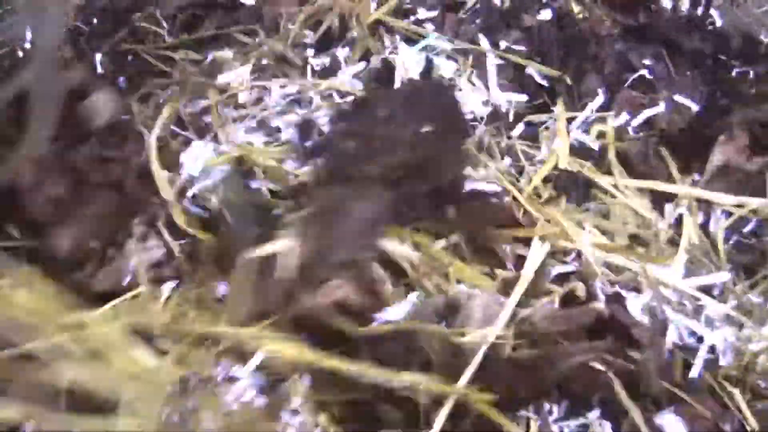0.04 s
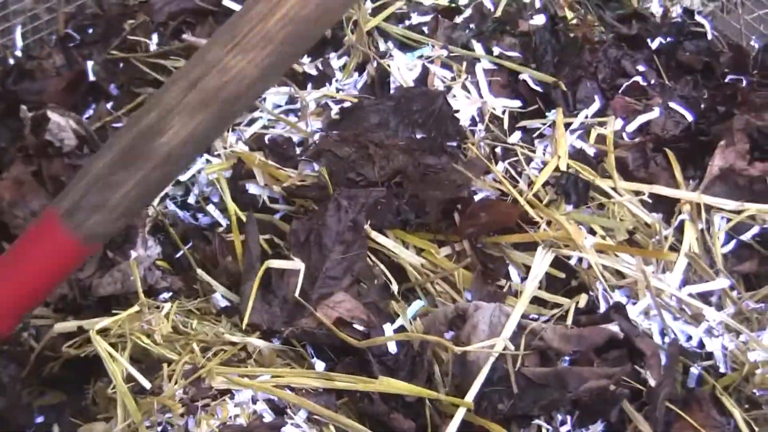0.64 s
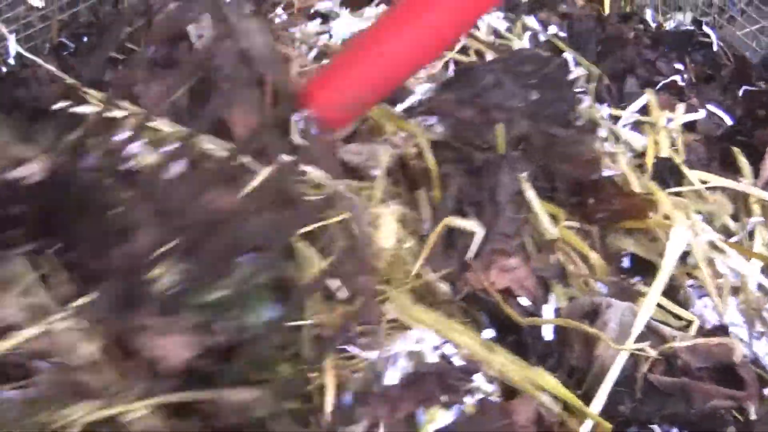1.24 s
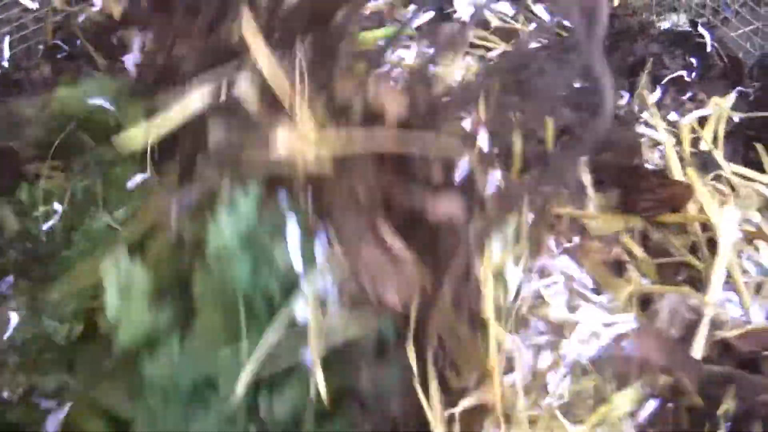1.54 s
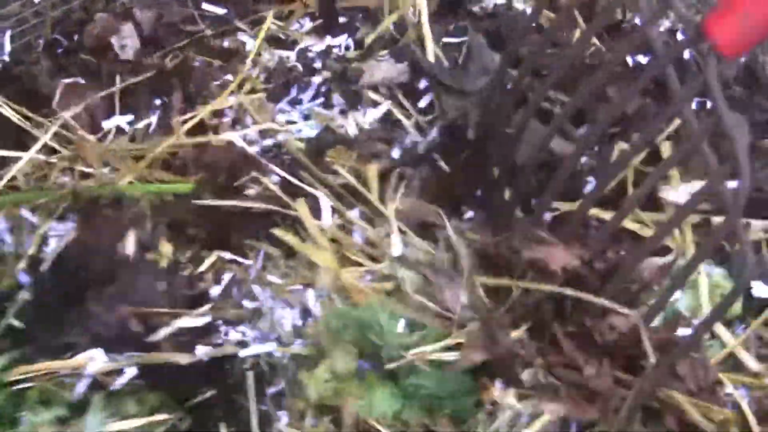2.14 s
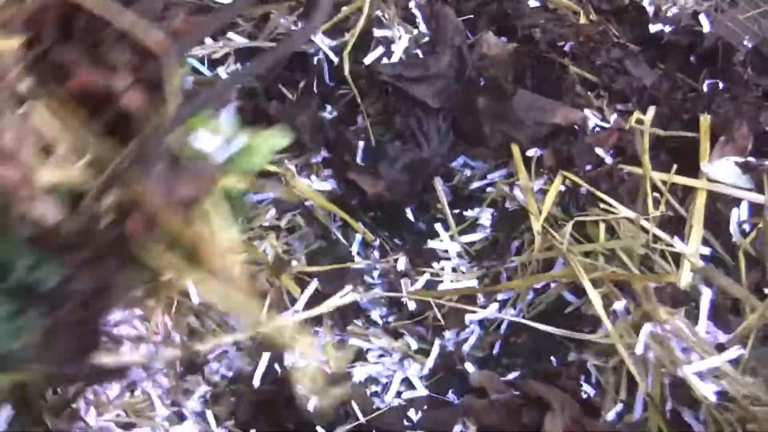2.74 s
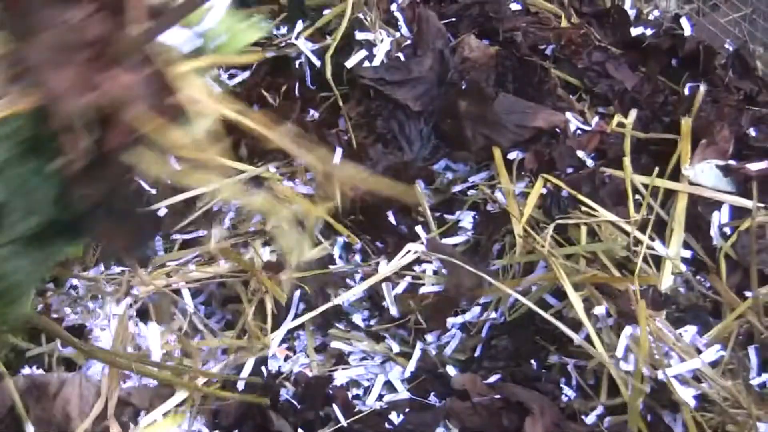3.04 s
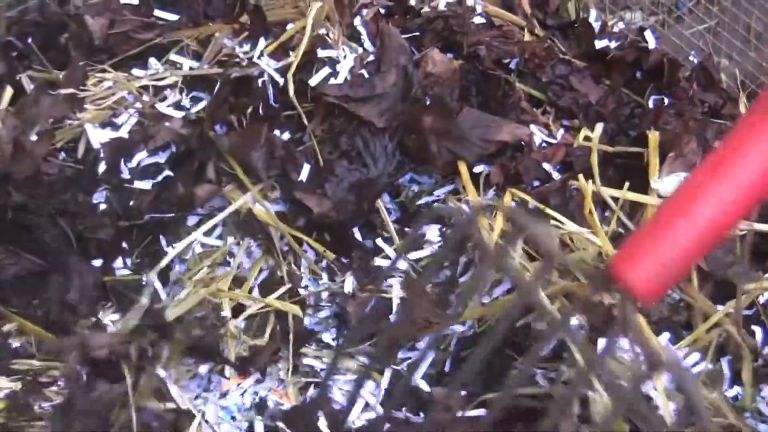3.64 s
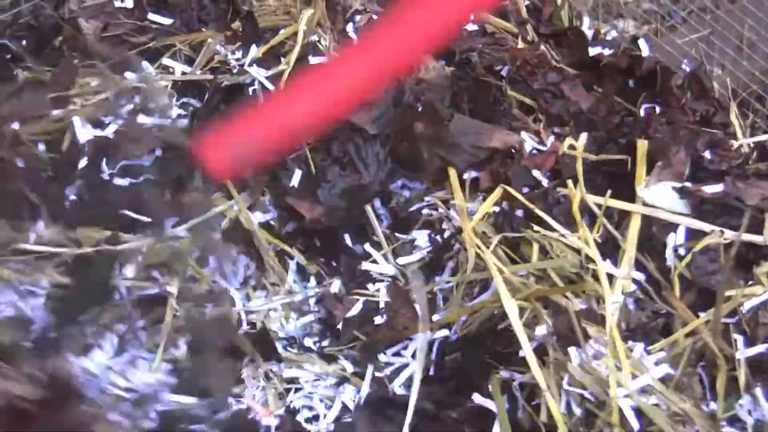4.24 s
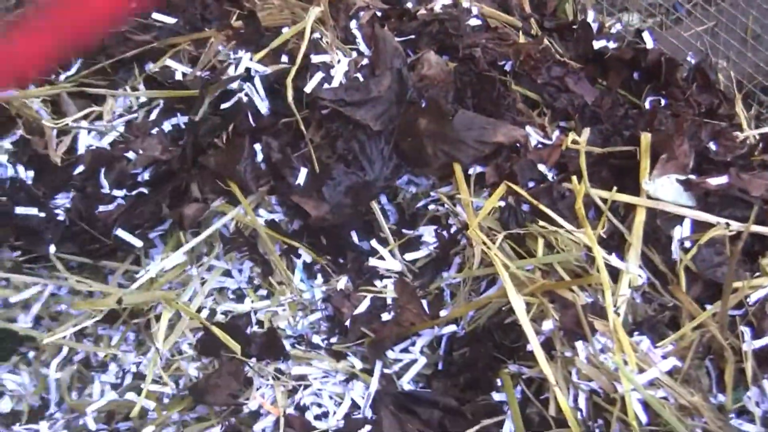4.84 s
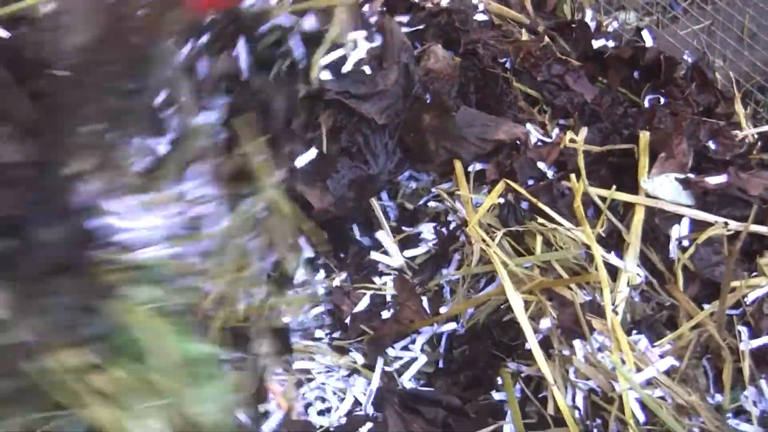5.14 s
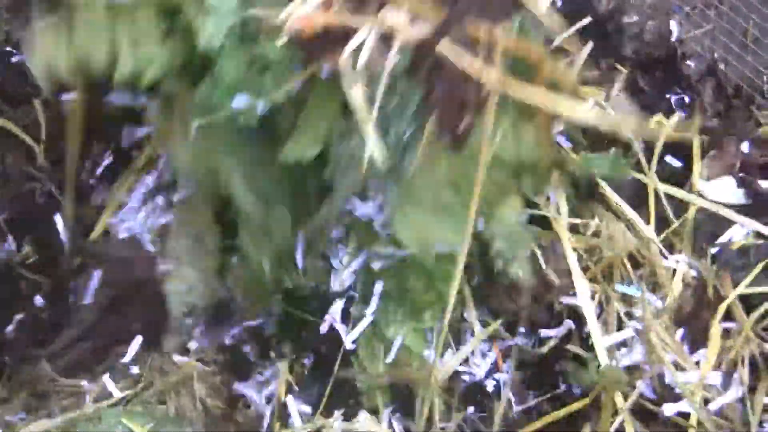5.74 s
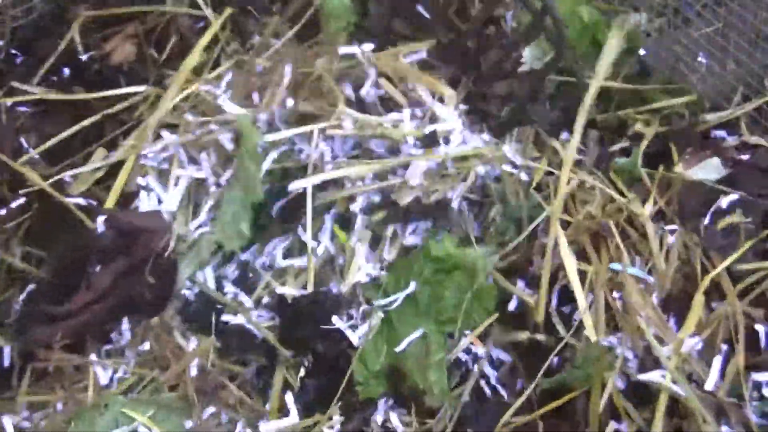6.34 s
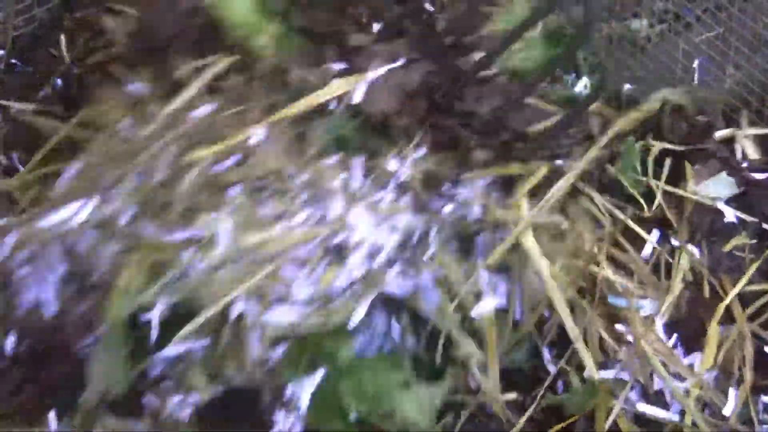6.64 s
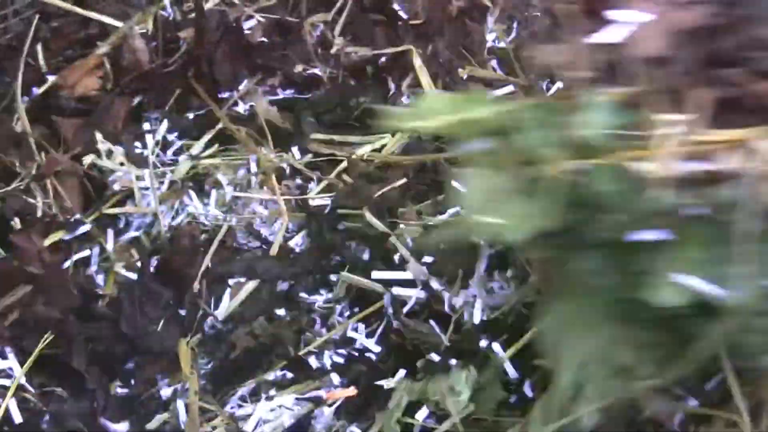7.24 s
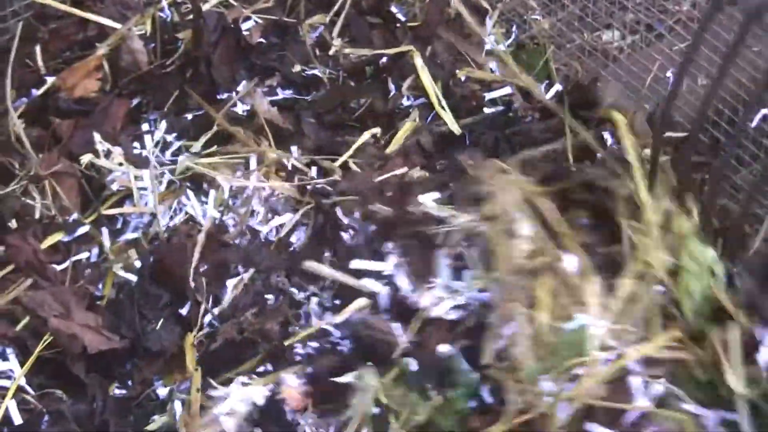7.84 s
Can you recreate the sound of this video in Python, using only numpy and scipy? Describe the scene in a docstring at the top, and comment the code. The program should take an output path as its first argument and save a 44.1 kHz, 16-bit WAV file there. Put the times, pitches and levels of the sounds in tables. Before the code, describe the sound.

A garden fork turns dry leaves, straw and shredded paper in a compost bin, heard close up over a low wash of outdoor air. For about eight seconds, uneven strokes swell and fade as a dense hiss with a crunch underneath, dotted with bright stalk snaps and tine ticks. Around 0.5 seconds the fork knocks and scrapes on the hollow, booming wall, with lighter knocks near 1.5. A deeper knock comes at 2.7, then sharp clacks and a short scrape just after 3, and another knock at 3.6. At about 4.6 the hardest blow briefly overloads the microphone, followed by more clacks and a scrape around 5. Tipped clumps land with soft thuds near 5.5 seconds, a light scrape follows at 6.2, and fainter thuds come at 7. One last knock falls near 7.8 among the closing rustling strokes.

```python
"""Outdoors, microphone close to a compost bin: a garden fork turns dry leaves, straw and shredded paper.
From the start, over a low wash of open air, each stroke swells and fades as a dense hiss. Soon the fork
knocks on the bin, stalks snap and the tines tick and scrape on the booming wall. Some four and a half
seconds in, the hardest blow overloads the microphone. Tipped clumps then land with soft thuds, near five
and a half seconds and again at seven, and one last knock falls among the closing strokes."""
import sys
import numpy as np
from scipy import signal
from scipy.fft import rfft, irfft, next_fast_len
from scipy.io import wavfile
from scipy.ndimage import uniform_filter1d, map_coordinates

SR = 44100
rng = np.random.default_rng(int(sys.argv[2]) if len(sys.argv) > 2 else 0)


def digitize_waveform(pressure):
    """Quantize a signal to 16-bit integers and store it at the path in sys.argv[1].

    Rows of a 2-D input are taken as channels; values are limited to [-1, 1].
    """
    field = np.atleast_2d(pressure).T
    bounded = np.clip(field, -1, 1)
    quanta = np.round(bounded * 32767).astype(np.int16)
    wavfile.write(sys.argv[1], SR, quanta)


N = 356769

# Distant air; leaves hissing close by; the packed bulk crunching under them.
# Each row: frequency in Hz, relative level per Hz in dB.
AIR_SPECTRUM = [(20, 1), (35, -5), (60, 2.5), (85, 3.5), (150, -1), (330, -2), (550, -10), (800, -9),
                (1500, -15), (4000, -29), (16000, -48)]
HISS_SPECTRUM = [(300, -10.5), (1000, -4.5), (2200, -2.5), (3100, 0.5), (4200, -2.5), (5200, -0.5),
                 (6200, -2), (7800, 1), (10000, -1), (13000, -2.5), (16000, -5)]
CRUNCH_SPECTRUM = [(100, -10.5), (300, 3), (550, 2.5), (800, 3.5), (1150, 3.5), (1600, 1.5), (2150, -7.5),
                   (3000, -5.5), (4500, -11.5), (9000, -23)]
# Stereo image of heap and bin at the microphone. Each row: frequency in Hz, left-right likeness, 0 to 1.
HEAP_LIKENESS = [(60, 0.74), (300, 0.23), (700, 0.52), (1300, 0.84), (2400, 0.73), (4400, 0.54),
                 (8000, 0.37), (15000, 0.091)]
BIN_LIKENESS = [(100, 0.99), (500, 0.9), (1200, 0.77), (2400, 0.47), (4500, 0.62), (12000, 0.86)]
# The fork going through the heap. Each row: crest, rise and fall in seconds, relative hiss level in dB,
# crunch offset from that level in dB.
FORK_STROKES = [(0.0, .1, 0.45, -47, -11), (0.337, 0.064, 0.063, -32, 4), (.68, 0.19, 0.78, -49.5, 8.5),
                (1.25, 0.48, 0.66, -43, -1), (1.92, 0.24, 0.21, -44.5, -1), (2.07, 0.14, 0.084, -40, 3),
                (2.5, 0.46, 0.73, -44.5, -3), (3.22, 0.12, 0.16, -39.5, 10), (3.54, 0.2, 0.2, -38, -1),
                (4.07, 0.081, 0.13, -38, -1.5), (4.3, 0.32, 0.42, -44, 0), (4.89, .08, 0.13, -42.5, 4.5),
                (5.17, 0.28, 0.29, -40.5, 4), (5.35, 0.3, 0.34, -42.5, -20), (6.19, 0.24, 0.1, -41.5, 0.5),
                (6.78, 0.41, .28, -42.5, -6.5), (7.17, 0.34, 0.32, -50, -15), (7.61, .19, 0.1, -40.5, 2),
                (8.09, 0.34, .2, -41.5, -4.5)]
# The fork hitting the bin. Each row: start in seconds, relative level in dB, boom and tine clank offsets
# from that level in dB, boom and clack centres in Hz.
FORK_KNOCKS = [(.164, -31, -29, -15, 352, 1230), (0.385, -25, -13, -13, 100, 1290),
               (.417, -26, -4, -27, 330, 675), (.457, -15.5, -10.5, -22, 375, 670),
               (.512, -23.5, -9, -21, 344, 676), (.533, -28.5, -4.5, -29, 377, 670),
               (1.105, -40.5, -3.5, -19, 290, 900), (1.508, -28, -6.5, -14.5, 334, 970),
               (1.602, -29.5, -9, -20, 288, 1100), (1.629, -29.5, -9.5, -12.5, 246, 1070),
               (2.605, -32.5, -10, -23, 330, 1400), (2.673, -15, 5, -19, 287, 1360),
               (3.047, -25.5, -32, -14, 137, 1050), (3.101, -6.5, -37, -10.5, 477, 1310),
               (3.108, -5.5, -21.5, -14.5, 480, 1330), (3.228, -19.5, -21, -8, 136, 1100),
               (3.602, -20, -15.5, -13, 292, 1170), (3.811, -26.5, -19, -13.5, 151, 980),
               (4.441, -29, -14, -24, 403, 775), (4.578, 0.5, -8, -23, 210, 910),
               (4.636, -21, -1, -20, 216, 780), (4.704, -23, -7, -9, 266, 920),
               (4.8, -32, -4.5, -11, 260, 1000), (4.968, -27.5, 6.5, -7.5, 194, 940),
               (5.001, -9.5, -31, -12, 150, 1020), (5.008, -12, -26, -8, 150, 1300),
               (5.138, -19.5, -22, -10.5, 150, 980), (5.204, -26, 2.5, -9, 237, 900),
               (5.344, -37, 1.5, 0, 218, 1250), (5.852, -48.5, 6.5, -9, 223, 800),
               (6.155, -29.5, -20, -19, 330, 1000), (6.26, -38.5, -3.5, -11, 280, 1100),
               (7.776, -31.5, -4, -11.5, 356, 730)]
# Main modes of wall and fork. Each row: frequency in Hz, relative level in dB, base t60 in seconds.
WALL_MODES = [(83, -8, 0.5), (146.6, -1, 0.31), (213.6, -3.5, 0.31), (267.7, 2.5, 0.062),
              (354.7, 2.5, 0.098), (396, -5.5, 0.22), (483, -4, 0.25), (518, -6, 0.084), (646, -9.5, 0.1),
              (776, -4.5, 0.16), (965.5, -6.5, 0.13), (1217, -18, 0.16), (1296, -4, 0.082),
              (1385, -12, 0.2), (1580, -32, 0.1), (1774, -14.5, 0.1), (1812, -12, 0.14),
              (1937, -15.5, 0.08), (1992, -9, 0.14), (2260, -22, 0.37), (2775, -16.5, .13),
              (3000, -14, 0.087), (3710, -18, 0.1)]
# The wall's crowded, short modes. Each row: frequency in Hz, relative level per Hz in dB.
CLATTER_SPECTRUM = [(50, -15), (130, -4), (280, -0.5), (450, -3), (620, -10.5), (900, -5), (1400, -12.5),
                    (2250, -8.5), (2650, -20), (3600, -26), (5000, -25.5), (9000, -32), (16000, -60)]
# How those modes die away. Each row: frequency in Hz, base t60 in seconds.
CLATTER_DECAY = [(100, 0.51), (500, 0.31), (2000, 0.32), (4000, 0.33), (10000, 0.069)]
# Snaps of dry stalks and ticks of the tines. Each row: start in seconds, relative level in dB, pitch in Hz.
SNAPS_AND_TICKS = [(.166, -23.5, 7800), (.281, -21, 6950), (2.075, -22, 3000), (2.718, -29, 4100),
                   (3.1, -15.5, 6530), (3.938, -24.5, 2810), (4.664, -19.5, 3460), (5.003, -19, 3400),
                   (5.007, -15.5, 6550), (5.702, -29, 9900), (5.84, -29.5, 5600), (6.241, -24, 10400),
                   (7.062, -24.5, 3250), (7.122, -31, 12500), (7.289, -26, 4300)]
# Tines dragged along the wall. Each row: start and end in seconds, boom, clack and clank levels in dB,
# boom and clack centres in Hz.
TINE_SCRAPES = [(0.431, 0.572, -39.5, -47.5, -72, 326, 650), (2.811, 2.85, -38, -51, -45.5, 136, 900),
                (2.94, 2.986, -44, -53.5, -56, 144.3, 900), (3.054, 3.117, -30.5, -37, -43, 134, 1000),
                (3.116, 3.268, -35.5, -30.5, -34.5, 132.6, 1280), (3.726, 3.8, -46, -53, -56, 131, 910),
                (5.004, 5.082, -42, -34, -35, 151, 1000), (6.173, 6.265, -47.5, -47.5, -49, 318, 985)]
# Forkfuls tipped into the bin. Each row: start and end in seconds, thud level in dB, boom centre in Hz.
TIPPED_FORKFULS = [(5.376, 5.53, -36.5, 207), (7.039, 7.32, -49, 310)]


def amp(db):
    """Decibels to gain."""
    return 10 ** (np.asarray(db) / 20)


def unit(x):
    """Scale to rms 1."""
    return x / np.sqrt(np.mean(x ** 2) + 1e-20)


def along(points, hz):
    """Read (Hz, value) points on a log axis."""
    knots_hz, values = np.transpose(points)
    return np.interp(np.log(hz + 1), np.log(knots_hz), values)


def wobble(rate):
    """A smooth random curve, rate knots a second."""
    knots = rng.standard_normal(int(N * rate / SR) + 4)
    return map_coordinates(knots, [np.arange(N) * rate / SR])


def filtered(x, response):
    """Pass x through a response given as a function of Hz."""
    n = x.shape[-1]
    padded = next_fast_len(n + 4096)
    return irfft(rfft(x, padded) * response(np.fft.rfftfreq(padded, 1 / SR)), padded)[..., :n]


def spread(pair, spectrum, likeness):
    """Colour two unrelated signals as mid and side, then decode to left and right, rms 1."""
    def response(hz):
        width = np.arccos(np.clip(along(likeness, hz), -1, 1)) / 2
        return amp(along(spectrum, hz)) * [np.cos(width), np.sin(width)]
    mid, side = filtered(pair, response)
    return unit(np.array([mid + side, mid - side]))


def noise(samples, spectrum, likeness):
    """Coloured stereo noise, rms 1."""
    return spread(rng.standard_normal((2, samples)), spectrum, likeness)


def add(track, start, sound):
    """Mix a sound into a track at start seconds."""
    part = track[:, max(round(start * SR), 0):][:, :sound.shape[-1]]
    part += sound[:, :part.shape[-1]]


def ticks(rate, scatter_db):
    """Two streams of tiny random contacts, rate a second, of uneven size."""
    struck = rng.random((2, N)) < rate / SR
    size = rng.standard_normal((2, N)) * amp(scatter_db * rng.standard_normal((2, N)))
    return unit(struck * size / np.sqrt(rate))


def open_air():
    """A low wash of air from far beyond the bin, wavering slightly."""
    return amp(-49.5 + 1.3 * wobble(5.2)) * noise(N, AIR_SPECTRUM, HEAP_LIKENESS)


def stroke_levels(drop_db=11.5, roundness=1.56):
    """Each stroke swells to its fastest moment and dies away. Gives hiss and crunch in dB."""
    t = np.arange(N) / SR
    hiss, crunch = amp(-55.5) ** 2, amp(-51.5) ** 2  # the heap keeps settling between strokes
    for crest, rise, fall, db, crunch_db in FORK_STROKES:
        away = np.abs(t - crest) / np.where(t < crest, rise, fall)
        power = amp(db - drop_db * away ** roundness) ** 2
        hiss += power
        crunch += power * amp(crunch_db) ** 2
    return 10 * np.log10(hiss), 10 * np.log10(crunch)


def shimmer(pair, depth_db=1.5):
    """Random, shifting patches of the spectrum swell and fade, giving the rustle a faint shimmer."""
    frames = signal.stft(pair, nperseg=1024)[2]
    patches = uniform_filter1d(rng.standard_normal(frames.shape[1:]), size=5, axis=0)
    patches = uniform_filter1d(patches, size=7, axis=1)
    return signal.istft(frames * amp(depth_db * unit(patches)), nperseg=1024)[1][:, :N]


def heap_rustle():
    """Close up, leaf edges rub into a hiss and the bulk crunches; faster sliding brings more flicks."""
    hiss_db, crunch_db = stroke_levels()
    flow = amp(hiss_db - hiss_db.max())
    flutter_db = wobble(45)
    flicks = ticks(900 + 5000 * flow, scatter_db=1.5)
    edges = shimmer(rng.standard_normal((2, N)) + .33 * flicks)
    hiss_gain = amp(hiss_db + 3 + .5 * flutter_db + .66 * wobble(170))
    hiss = hiss_gain * spread(edges, HISS_SPECTRUM, HEAP_LIKENESS)
    folds = shimmer(ticks(4000 + 9000 * flow, scatter_db=2))
    crunch = amp(crunch_db - 4 + flutter_db) * spread(folds, CRUNCH_SPECTRUM, HEAP_LIKENESS)
    return hiss + crunch


def wall_ring(decay_scale, clatter_db=-6, slap_db=6, slap_t60=.045):
    """One blow on the wall: main modes at random strengths, a clatter of crowded modes, the first slap."""
    t = np.arange(SR // 2) / SR
    hz, db, t60 = np.transpose(WALL_MODES)[:, :, None]
    scatter_db, phase = rng.standard_normal((2, len(WALL_MODES), 1))
    loaded_hz = hz * (1 + .0045 * rng.standard_normal(hz.shape))  # leaning compost shifts each mode
    envelopes = amp(db + scatter_db - 60 * t / (t60 * decay_scale))
    modes = envelopes * np.sin(2 * np.pi * (loaded_hz * t + phase))
    crowd = noise(len(t), CLATTER_SPECTRUM, BIN_LIKENESS)
    band_hz, frame_s, frames = signal.stft(crowd, SR, nperseg=256)
    band_t60 = decay_scale * along(CLATTER_DECAY, band_hz)[:, None]
    clatter = signal.istft(frames * amp(-60 * frame_s / band_t60), SR, nperseg=256)[1][:, :len(t)]
    slap = noise(len(t), CLATTER_SPECTRUM, BIN_LIKENESS) * amp(-60 * t / slap_t60)
    return modes.sum(0) + amp(clatter_db) * clatter + amp(slap_db) * slap


def contact(ring, boom_db, clack_db, clank_db, boom_hz, clack_hz, boom_q, span_s):
    """The point of contact favours a boom and a clack pitch. Levels are rms over the first span_s."""
    def band(edges_hz, kind):
        return signal.sosfilt(signal.butter(3, edges_hz, kind, fs=SR, output="sos"), ring)
    boom = signal.lfilter(*signal.iirpeak(boom_hz, Q=boom_q, fs=SR), band(600, "lowpass"))
    clack = signal.lfilter(*signal.iirpeak(clack_hz, Q=2.3, fs=SR), band([580, 1600], "bandpass"))
    clank = band(1600, "highpass")
    parts = [(boom_db, boom), (clack_db, clack), (clank_db, clank)]
    return sum(amp(db) * part / np.std(part[:, :int(span_s * SR)]) for db, part in parts)


def fork_knocks():
    """Blows cushioned by compost boom, bare tines clank; the harder the blow, the longer the ring."""
    track = np.zeros((2, N))
    for start, db, boom_db, clank_db, boom_hz, clack_hz in FORK_KNOCKS:
        force_db = db + max(boom_db, 0)
        ring = wall_ring(decay_scale=np.clip(1.4 + .013 * force_db, .6, 1.1))
        levels_db = db + boom_db + .46, db - 9, db + clank_db + .5
        add(track, start, contact(ring, *levels_db, boom_hz, clack_hz, boom_q=1.29, span_s=.0099))
    return track


def snaps_and_ticks(t60=.051, trim_db=-11, ping_db=-8):
    """Short, bright snaps of dry stalks and ticks of the tines, each with a brief ping."""
    track = np.zeros((2, N))
    t = np.arange(SR // 16) / SR
    for start, db, hz in SNAPS_AND_TICKS:
        spectrum = [(hz / 8, -20), (hz / 2, -13), (hz, 0), (hz * 2, -13)]
        burst = noise(len(t), spectrum, HEAP_LIKENESS)
        ping = amp(ping_db) * np.sin(2 * np.pi * hz * t)
        add(track, start, amp(db + trim_db - 60 * t / t60) * (burst + ping))
    return track


def tine_scrapes():
    """The tines stick and slip; every slip rings the wall, which groans on a low mode."""
    track = np.zeros((2, N))
    slips = ticks(700, scatter_db=1)[0]
    for start, end, *voice in TINE_SCRAPES:
        drag = slips[int(start * SR):int(end * SR)]
        ring = wall_ring(decay_scale=.48, clatter_db=0, slap_db=16, slap_t60=.01)
        groan = signal.fftconvolve(drag[None], ring, axes=1)
        add(track, start, contact(groan, *voice, boom_q=11, span_s=len(drag) / SR))
    return track


def falling_clumps(gap_s=.065, jitter_s=.0054, scatter_db=.5):
    """Clumps drop off the fork at uneven intervals and thud softly against the wall."""
    track = np.zeros((2, N))
    for start, end, thud_db, boom_hz in TIPPED_FORKFULS:
        for due in np.arange(start, end, gap_s):
            late, softness = rng.standard_normal(2)
            db = thud_db - scatter_db * softness
            ring = wall_ring(decay_scale=.7)
            thud = contact(ring, db, db - 16, db - 30, boom_hz, clack_hz=835, boom_q=1.9, span_s=.015)
            add(track, due + jitter_s * late, thud)
    return track


def scene(right_lead_s=.00005):
    """The bin's blows reach the microphone's right side first; heap and air sit a touch to the left."""
    blows = fork_knocks() + tine_scrapes() + falling_clumps()
    delay_s = np.array([[.5], [-.5]]) * right_lead_s
    blows = filtered(blows, lambda hz: np.exp(-2j * np.pi * hz * delay_s))
    heap_and_air = heap_rustle() + snaps_and_ticks() + open_air()
    return blows + heap_and_air * amp([[.2], [-.2]])


def record(dry):
    """The close microphone flattens peaks at full scale and keeps nothing above 15.9 kHz."""
    clipped = dry / (1 + np.abs(dry) ** 8) ** (1 / 8)
    return filtered(clipped, lambda hz: hz < 15900)


dry = scene()
out = record(dry)
digitize_waveform(out)
```